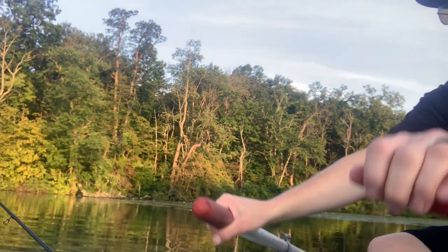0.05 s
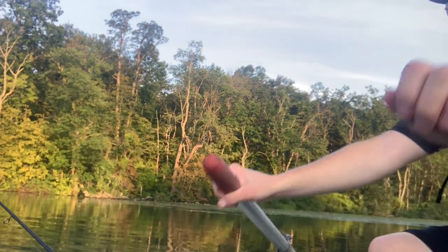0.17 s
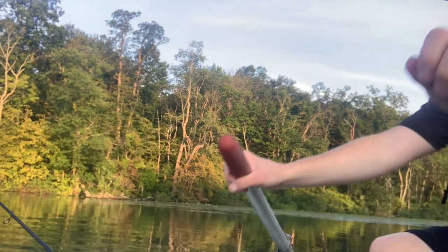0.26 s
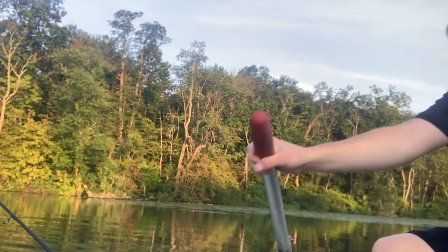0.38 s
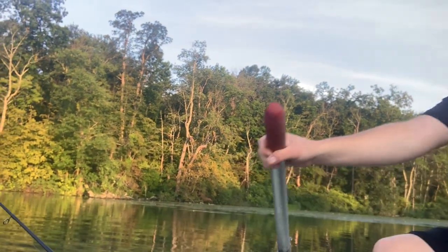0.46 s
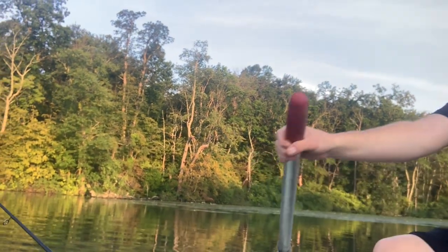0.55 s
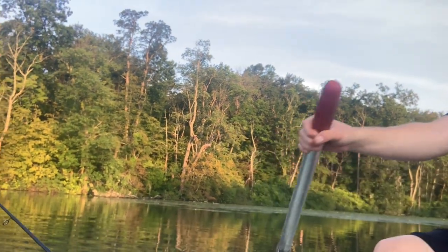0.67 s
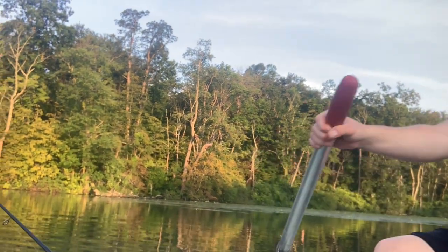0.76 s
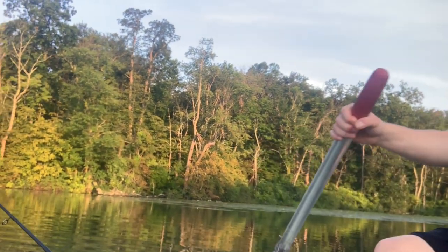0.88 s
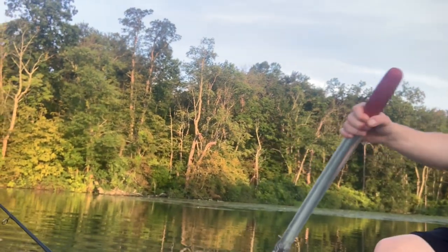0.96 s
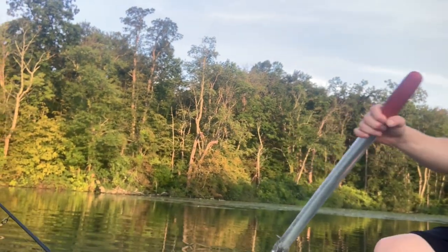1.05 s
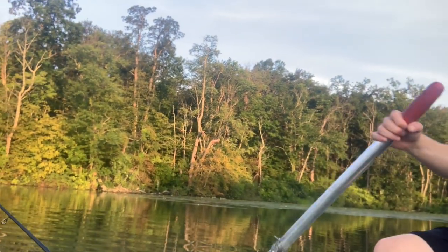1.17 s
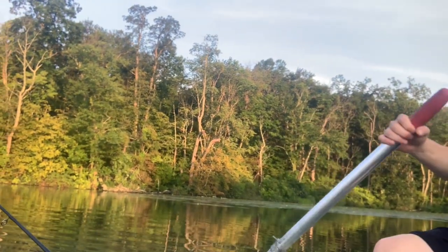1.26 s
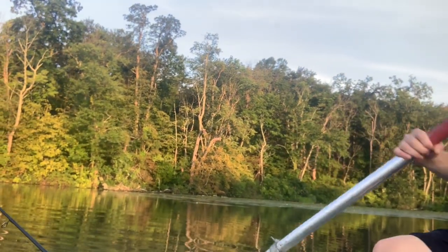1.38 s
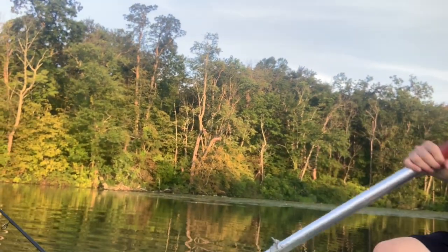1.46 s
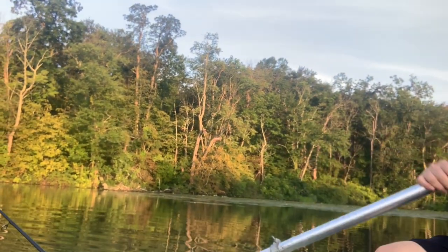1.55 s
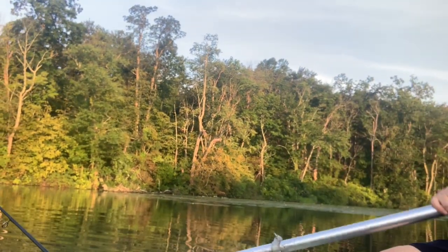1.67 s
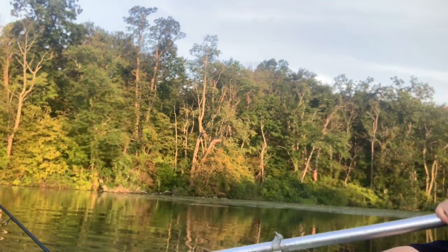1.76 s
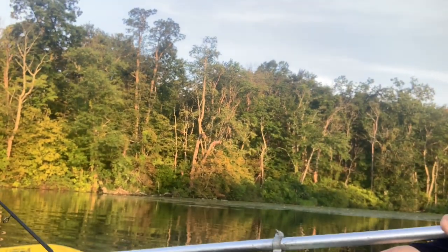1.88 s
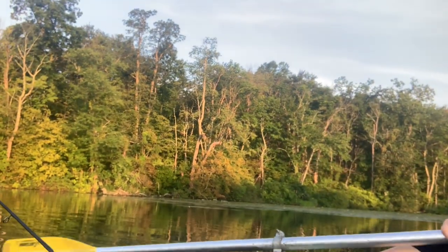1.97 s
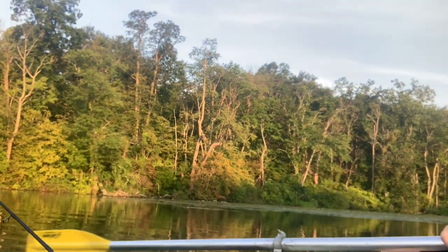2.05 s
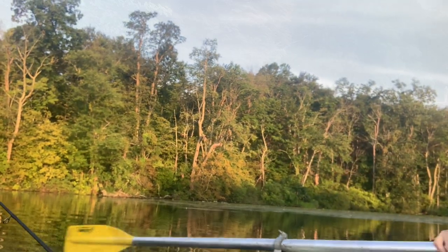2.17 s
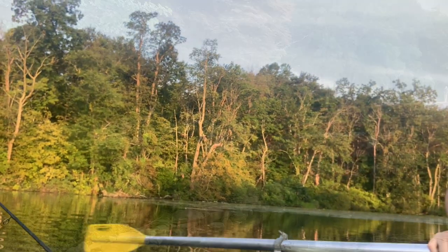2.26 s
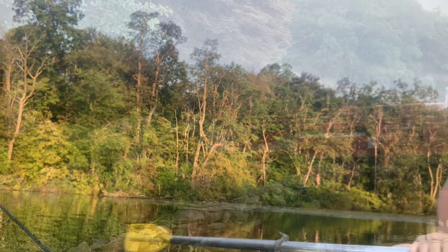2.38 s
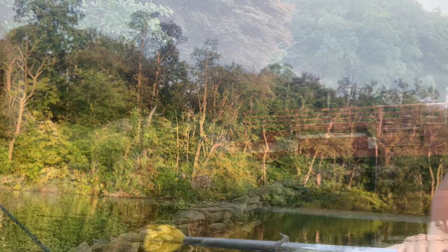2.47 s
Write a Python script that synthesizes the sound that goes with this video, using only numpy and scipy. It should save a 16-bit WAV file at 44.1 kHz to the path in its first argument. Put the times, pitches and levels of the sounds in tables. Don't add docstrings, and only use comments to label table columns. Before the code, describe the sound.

Rowing boat oars groan and clack in their locks as water drips off the blade

```python
import sys
import numpy as np
from scipy import signal
from scipy.fft import rfft, irfft, next_fast_len
from scipy.io import wavfile
from scipy.ndimage import uniform_filter1d, map_coordinates

SR = 44100
rng = np.random.default_rng(int(sys.argv[2]) if len(sys.argv) > 2 else 0)


def level_to_linear(level):
    exponent = np.asarray(level, float) / 20
    return 10 ** exponent


def inscribe(sig):
    pcm = np.round(np.clip(np.atleast_2d(sig).T, -1, 1) * 32767)
    wavfile.write(sys.argv[1], SR, pcm.astype(np.int16))


N = 110250
T = np.arange(N) / SR
LOCK_ALIKE = 0.22


def unit(x):
    return x / np.sqrt(np.mean(x ** 2) + 1e-20)


def along(points, hz):
    f, v = np.transpose(points)
    return np.interp(np.log(hz + 1), np.log(f + 1), v)


def curve(rows):
    s, db = np.transpose(rows)
    return level_to_linear(np.interp(T, s, db, left=-120, right=-120))


def noise_pair():
    return rng.standard_normal((2, N))


def wobble(rate):
    return map_coordinates(rng.standard_normal(int(N * rate / SR) + 4), [T * rate])


def filtered(x, response):
    m = next_fast_len(x.shape[-1] + SR // 4)
    spectrum = rfft(x, m) * response(np.fft.rfftfreq(m, 1 / SR))
    return irfft(spectrum, m)[..., :x.shape[-1]]


def resonances(peaks, f):
    total = 0
    for k, (c, w, db) in enumerate(peaks):
        total = total + (-1) ** k * level_to_linear(db) * 1j * f * w / (c * c - f * f + 1j * f * w)
    return total


def flat_bands(bands, f):
    return [(db, np.exp(-((f - c) / w) ** 4)) for c, w, db in bands]


def pair(a, b, alike):
    u = np.arccos(np.clip(alike, -1, 1)) / 2
    return np.array([np.cos(u) * a + np.sin(u) * b, np.cos(u) * a - np.sin(u) * b])


def add(out, s, x):
    part = out[..., round(s * SR):][..., :x.shape[-1]]
    part += x[..., :part.shape[-1]]


# frequency in Hz, level in dB per Hz.
AIR_COLOUR = [(300, -67.5), (800, -3), (4000, -5), (8500, -8), (9500, -15), (16400, -39.5)]
# centre in Hz, width in Hz, level in dB.
INSECT_BANDS = [(5716, 904, 3), (6260, 1700, -23.5), (7640, 300, -47.5), (11200, 1000, -15),
                (14900, 990, -21)]
# time in
# seconds, level in dB.
FAINT_TREBLE = [(0, -2), (.5, 4.5), (.64, -1.5), (.94, -7), (.97, -1.5), (2.5, 1)]


def shore():
    air_db, insect_db, faint_hz, alike = -63, -60.5, 7000, 0.18
    air = unit(filtered(noise_pair(), lambda f: level_to_linear(along(AIR_COLOUR, f))))
    air = air * level_to_linear(air_db + 0.37 * wobble(1.6))

    def song(f):
        return sum(level_to_linear(db) * shape for db, shape in flat_bands(INSECT_BANDS, f))

    chorus = unit(filtered(noise_pair(), song))
    chorus = chorus * level_to_linear(insect_db + 0.27 * wobble(9.3) + 0.97 * wobble(38.6))
    both = air + chorus
    high = filtered(both, lambda f: f > faint_hz)
    return pair(*(both + high * (curve(FAINT_TREBLE) - 1)), alike)


# time in seconds, level in dB.
WASH_LEVEL = [(0, -45), (.07, -59), (.17, -61), (.2, -34.5), (.31, -53.5), (.38, -39.5), (.55, -48.5),
              (.63, -40), (.82, -44), (.94, -50), (1.05, -39), (1.47, -52.5), (1.66, -49), (1.75, -43.5),
              (1.9, -58.5), (2.05, -48.5), (2.25, -63.5), (2.5, -63)]
# frequency in Hz, level in dB per Hz.
WASH_COLOUR_DB = [(150, -30.5), (330, 2.5), (600, -8), (700, -16), (1500, -18.5), (1700, -23.5),
                  (3500, -35), (9000, -72)]
# centre in Hz, width in Hz, level in dB.
HULL_PANELS = [(427.2, 5.6, 6.5), (541.6, 20.7, 1.5), (944, 4, 5.5)]


def wash():
    wash_db, alike = 3, 0.43
    z = signal.stft(noise_pair(), nperseg=256)[2]
    patches = uniform_filter1d(rng.standard_normal(z.shape[1:]), 3, 0)
    patches = unit(uniform_filter1d(patches, 10, 1))
    noise = signal.istft(z * level_to_linear(2.5 * patches), nperseg=256)[1][:, :N]

    def colour(f):
        return level_to_linear(along(WASH_COLOUR_DB, f)) * (1 + abs(resonances(HULL_PANELS, f)))

    level = curve(WASH_LEVEL) * level_to_linear(wash_db + 1.5 * wobble(20))
    return pair(*unit(filtered(noise, colour)), alike) * level


def bubbles(s, gain, hz, cycles, rise=.07):
    t = np.arange(SR // 25) / SR
    u = t * (hz / cycles)[:, None]
    phase = 2 * np.pi * hz[:, None] * t * (1 + rise * u / 2)
    wave = gain[:, None] * 7 * u * np.exp(-2.6 * u) * np.sin(phase)
    at = np.round(s * SR).astype(int)[:, None] + np.arange(len(t))
    return np.bincount(at.ravel(), wave.ravel(), N + SR)[:N]


# start in seconds, peak in dB, pitch in Hz.
DRIPS = [(1.633, -46, 3400), (1.674, -54, 1290), (1.684, -54, 1950), (1.727, -49, 1790), (1.731, -37, 3930),
         (1.749, -38.5, 2070), (1.809, -48, 1200), (1.818, -46, 2100), (1.834, -52, 1570),
         (1.863, -42, 4400), (1.934, -42, 6750), (1.939, -52.5, 1240), (1.947, -54, 2200),
         (1.966, -48, 1500), (1.992, -45, 3610)]
# start in seconds, peak in dB, pitch in Hz.
TICKING_DROPS = [(1.6345, -35.5, 6300), (1.66, -55, 2850), (1.681, -38, 6500), (1.683, -39, 4400),
                 (1.7175, -34.5, 4280), (1.7175, -36, 5950), (1.745, -46, 4100), (1.753, -46, 2460),
                 (1.819, -44, 7200), (1.819, -40, 4500), (1.833, -49, 3340), (1.849, -36.5, 4500),
                 (1.885, -35.5, 5100), (1.887, -38, 6850), (1.899, -37, 4000), (1.97, -55, 5260),
                 (1.972, -45.5, 8360)]
# start in seconds, peak in dB, starting pitch in Hz.
LARGE_BUBBLES = [(1.842, -44.5, 1014), (1.853, -48, 1130), (1.871, -36.5, 834), (1.874, -54, 1150),
                 (1.887, -46, 900), (1.894, -44, 923)]


def drops():
    out = np.zeros(N)
    for rows, cycles, rise in (DRIPS, 8, .07), (TICKING_DROPS, 6.1, .07), (LARGE_BUBBLES, 10, .3):
        s, db, hz = np.transpose(rows)
        out += bubbles(s, level_to_linear(db), hz, np.full(len(hz), cycles), rise)
    return out


# time in seconds, level in dB.
RUN_OFF = [(1.6, -61), (1.66, -60), (1.75, -53), (1.79, -63), (1.88, -54.5), (1.98, -67.5), (2.2, -68.5)]


def trickle():
    drops_per_s, centre_hz, log_spread, cycles = 1100, 2200, .7, 8
    r, g = rng.random((6000, 2)), rng.standard_normal((6000, 2))
    s = np.cumsum(-np.log(r[:, 0])) / drops_per_s
    keep = (s > RUN_OFF[0][0]) & (s < RUN_OFF[-1][0])
    s, r, g = s[keep], r[keep], g[keep]
    spread_db = np.minimum(-5 * np.log(r[:, 1]), 17) - 5
    gain = curve(RUN_OFF)[(s * SR).astype(int)] * level_to_linear(spread_db)
    hz = np.clip(centre_hz * np.exp(log_spread * g[:, 0]), 500, 6800)
    return bubbles(s, gain, hz, cycles * np.exp(.5 * g[:, 1]))


# frequency in Hz, level in dB per Hz.
CRACK_COLOUR = [(350, -35), (600, -2), (1370, -9), (4520, -15), (6550, -9), (9240, -13.5), (11000, -18),
                (16000, -21.5)]


def crack_db(f):
    return along(CRACK_COLOUR, f)


def spray():
    spray_db = -5
    flicker = noise_pair() * level_to_linear(2.5 * wobble(160))
    return unit(filtered(flicker, lambda f: level_to_linear(crack_db(f)))) * curve(RUN_OFF) * level_to_linear(spray_db)


def water():
    lead_samples = 8
    single = (drops() + trickle()) * level_to_linear(2.3 * wobble(450))
    left, right = (single + spray()) * level_to_linear([[2.2], [-2.2]])
    return np.array([left, np.roll(right, -lead_samples)])


# time in seconds, level in dB.
SLIDE_LEVEL = [(.186, -65.5), (.2, -58.5), (.215, -54.5), (.222, -46), (.238, -36), (.25, -49), (.28, -56)]
# frequency in Hz, level in dB per Hz.
SLIDE_COLOUR = [(400, -16), (1600, 3.5), (4000, -6.5), (16000, -16)]


def scrape():
    grit = noise_pair() * level_to_linear(2.5 * wobble(500))
    slide = unit(filtered(grit, lambda f: level_to_linear(along(SLIDE_COLOUR, f))))
    return pair(*slide, LOCK_ALIKE) * curve(SLIDE_LEVEL)


# start in seconds, pitch in Hz, peak in dB, t60 in seconds.
STRUCK_MODES = [(.0695, 2230, -30, 0.046), (0.068, 2860, -48.5, 0.025), (.0685, 4270, -54, .02),
                (.0685, 7130, -42, 0.015), (0.188, 2660, -42.5, 0.022), (0.197, 3200, -47, 0.018),
                (1.168, 1910, -40, 0.14), (.228, 2010, -47, .03), (0.234, 2745, -35, 0.027),
                (0.235, 4440, -43, 0.022), (0.237, 1560, -39, .05), (1.227, 1310, -43, 0.046),
                (1.227, 5490, -46, .04), (1.225, 2693, -39, 0.068), (1.2315, 7610, -34, 0.028),
                (1.247, 1290, -42, .06), (1.3355, 1360, -40, 0.036), (1.3336, 7630, -44, 0.018),
                (1.558, 1370, -39, 0.048), (1.556, 5360, -30, 0.039), (1.559, 6730, -32, 0.054),
                (1.558, 7590, -32.5, .03), (1.57, 2550, -39, 0.052)]


def rings():
    out, t = np.zeros(N), np.arange(SR // 10) / SR
    onset = 1 - np.exp(-t / 0.00038)
    for s, hz, db, t60_s in STRUCK_MODES:
        add(out, s, level_to_linear(db - 60 * t / t60_s) * np.sin(2 * np.pi * hz * t) * onset)
    return out * (1 + .3 * wobble(600))


# start in seconds, peak in dB, rattle in seconds, dullness in dB per octave.
COLLAR_CLACKS = [(0.0683, -48, .002, -4.5), (0.221, -45.5, .006, -11), (0.2348, -45.5, .003, 1.5),
                 (0.482, -46, .001, -6), (1.1657, -31, .002, 2.5), (1.171, -42.5, .004, 14),
                 (1.2229, -27, .002, -3), (1.227, -28, .002, 0.5), (1.2316, -27, .004, 6.5),
                 (1.237, -33, .008, 6.5), (1.248, -35, .002, 0), (1.261, -43, .006, 4),
                 (1.335, -34, 0.002, -1), (1.339, -52.5, .003, -3.5), (1.476, -41.5, .001, -2),
                 (1.5515, -35, 0.0035, 1), (1.5562, -20, 0.002, -3.5), (1.5607, -23, .002, -1.5),
                 (1.567, -32, .004, 5), (1.967, -45.5, 0.0024, -2), (2.436, -46, 0.016, 19),
                 (2.487, -31, 0.007, 4.5)]
# centre in Hz, width in Hz, level in dB.
LOCK_MODES = [(1320, 140, 6), (1930, 160, 5), (2650, 200, 5), (3200, 250, 4), (5400, 250, 10),
              (7620, 250, 8)]
# frequency in Hz, t60 in seconds.
CRACK_DECAY = [(800, 0.15), (3000, 0.1), (7000, 0.015), (12000, 0.016)]


def clacks():
    clack_db = -7
    out, t = np.zeros((2, N)), np.arange(SR // 4) / SR
    for s, db, rattle_s, dull_db in COLLAR_CLACKS:
        hz, tt, z = signal.stft(rng.standard_normal((2, len(t))), SR, nperseg=64)
        fade = level_to_linear(-60 * np.clip(tt - rattle_s, 0, None) / along(CRACK_DECAY, hz)[:, None])
        colour = level_to_linear(crack_db(hz) - dull_db * np.log2(hz / 4000 + 0.3))[:, None]
        crack = signal.istft(z * fade * colour, SR, nperseg=64)[1][:, :len(t)]
        grain_db = 2 * rng.standard_normal(len(t) // 40 + 1)
        crack = crack * level_to_linear(grain_db).repeat(40)[:len(t)]
        tune = rng.normal(1, .012)
        crack = filtered(pair(*crack, LOCK_ALIKE), lambda f: 1 + resonances(LOCK_MODES, f * tune))
        add(out, s, level_to_linear(db + clack_db) * crack / np.std(crack[:, :SR // 200]))
    return out


# centre in Hz, width in Hz, level in dB.
HULL_MODES = [(65.2, 19.4, 2), (83.7, 22.4, 3.5), (119, 14.2, 4.5), (179.8, 28.8, -2.5), (221.8, 16.4, 0.5),
              (306, 92, -11.5)]


def hull(f):
    return resonances(HULL_MODES, f)


# start in seconds, peak in dB, pitch in Hz.
HULL_BUMPS = [(0.199, -18.5, 292), (0.199, -30.5, 524), (.212, -23.5, 270), (.368, -18.5, 231),
              (0.379, -19, 273), (0.404, -20.5, 227), (0.414, -26.5, 232), (0.613, -24.5, 508),
              (0.342, -35, 560), (.985, -33.5, 610), (.995, -23.5, 210), (1.013, -18, 210),
              (1.07, -28, 116), (1.169, -20.5, 525), (1.516, -32, 206), (1.572, -23.5, 489),
              (1.578, -20.5, 186), (1.708, -25.5, 210), (2.443, -35.5, 492), (2.491, -17.5, 484)]


def bumps():
    cycles = 1.45
    out, push, t = np.zeros(N), np.zeros(N), np.arange(SR // 10) / SR
    for s, db, hz in HULL_BUMPS:
        u = t * hz / cycles
        add(out, s, level_to_linear(db) * np.e * u * np.exp(-u * 1.434) * np.sin(2 * np.pi * hz * t))
        add(push, s, level_to_linear(db + 37.0) * np.hanning(round(SR / hz / 4)) / round(SR / hz / 8))
    return out + filtered(push, hull)


# start and length in seconds, pitch in Hz, peak in dB.
STICK_SLIPS = [(0.6024, 0.066, 221, -9), (0.678, 0.043, 221, -20), (0.8, 0.046, 250, -30),
               (.766, 0.031, 213, -23.5), (.8, 0.047, 428, -33.5), (.865, .04, 192.7, -28),
               (0.67, 0.044, 119, -24.5), (.655, .045, 80, -20.5), (0.8, 0.032, 70, -30.5),
               (0.75, 0.057, 76, -27), (1.125, 0.045, 70, -26.5), (1.04, 0.042, 221, -22.5),
               (1.164, 0.059, 221, -24.5), (1.6, 0.07, 116.3, -33), (2.0, 0.058, 117.9, -25),
               (2.313, 0.085, 116.7, -26.5), (.325, 0.036, 550, -38), (0.32, 0.067, 460, -35.5),
               (.37, 0.051, 194.9, -22)]


def groans():
    rise_part, sag_db, stop_s = .5, 4, .005
    out = np.zeros(N)
    for s, length_s, hz, db in STICK_SLIPS:
        t = np.arange(round((length_s + .03) * SR)) / SR
        rise = np.clip(t / (rise_part * length_s), 0, 1)
        after = np.clip(t / length_s - rise_part, 0, None)
        sag = level_to_linear(-sag_db * after / (1 - rise_part))
        stop = np.exp(-np.clip(t - length_s, 0, None) / stop_s)
        add(out, s, level_to_linear(db) * rise * sag * stop * np.sin(2 * np.pi * hz * t))
    return out


# time in seconds, level in dB.
OAR_LOAD = [(0, -33), (.08, -42), (.16, -46.5), (.21, -34.5), (.33, -41.5), (.4, -32.5), (.49, -37),
            (.59, -30), (.7, -31.5), (.92, -36.5), (1.1, -36.5), (1.25, -36.5), (1.42, -44), (1.75, -34.5),
            (1.91, -43), (2.04, -32.5), (2.24, -45), (2.5, -36)]


def rubbing():
    slips_per_s, rub_noise, rub_db, soft_hz, alike = 350, .6, 3, 900, 0.88
    slips = (rng.random((2, N)) < slips_per_s / SR) * noise_pair()
    force = (unit(slips) + rub_noise * noise_pair()) * level_to_linear(1.95 * wobble(13.73))

    def soft_hull(f):
        return hull(f) / (1 + 1j * f / soft_hz) ** 2

    scale = np.std(filtered(force, soft_hull))
    shaken = filtered(force * curve(OAR_LOAD), soft_hull)
    return pair(*shaken, alike) * level_to_linear(rub_db) / scale


def scene():
    background = shore() + wash() + water()
    lock = scrape() + rings() + clacks()
    boat = (bumps() + groans() + rubbing()) * level_to_linear([[1], [-1]])
    return background + lock + boat


def low_pass(x):
    return signal.sosfilt(signal.butter(12, 16650, fs=SR, output="sos"), x)


# centre in Hz, width in Hz, level in dB.
TREBLE_DIPS = [(9480, 370, -11), (13600, 390, -23)]


def record(dry):
    treble_hz, treble_share, right_lag_s, top_hz = 8800, .7, .000272, 15900

    def shared(f):
        return np.sqrt(treble_share) / (1 + (treble_hz / (f + 1)) ** 30)

    def port(f):
        lag = np.exp(-2j * np.pi * f * right_lag_s * np.array([[0], [1]]))
        dips = level_to_linear(sum(db * shape for db, shape in flat_bands(TREBLE_DIPS, f)))
        return lag * dips * (f < top_hz) * f / (f + 30)

    own = filtered(dry, lambda f: (1 - shared(f)) * port(f))
    both = filtered(dry.sum(0) * np.sqrt([[.5], [.5]]), lambda f: shared(f) * port(f))
    return low_pass(own + both)


dry = scene()
out = record(dry)
inscribe(out)
```